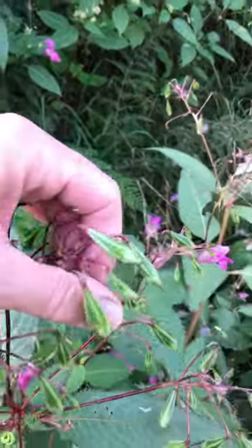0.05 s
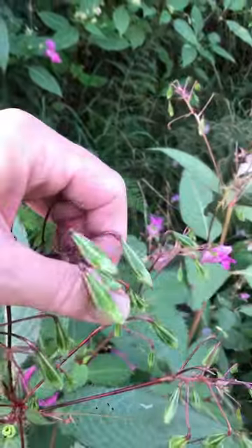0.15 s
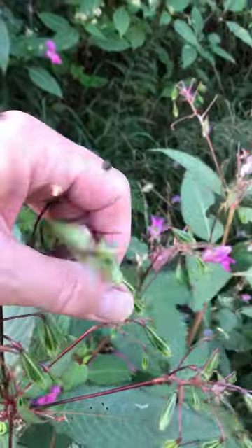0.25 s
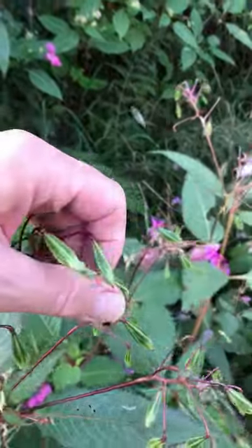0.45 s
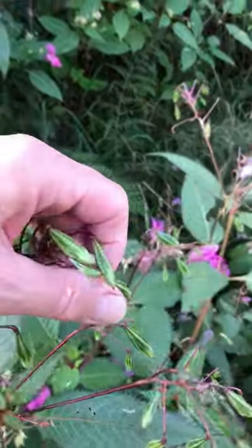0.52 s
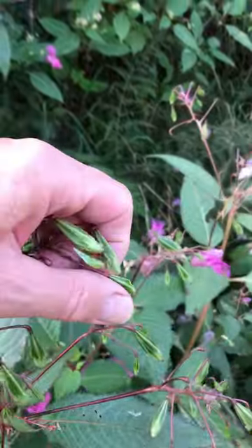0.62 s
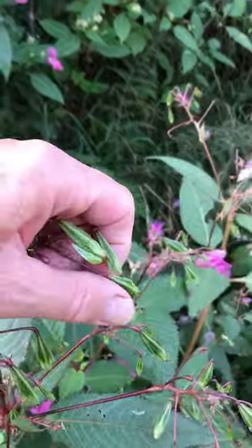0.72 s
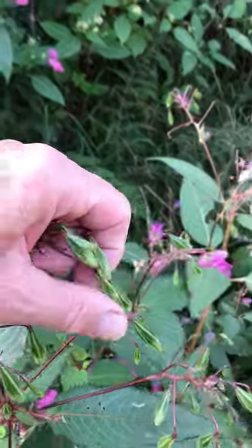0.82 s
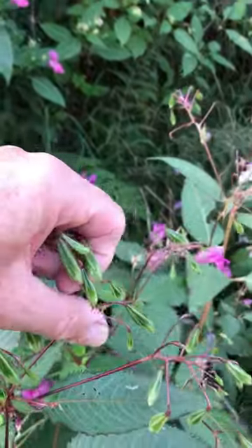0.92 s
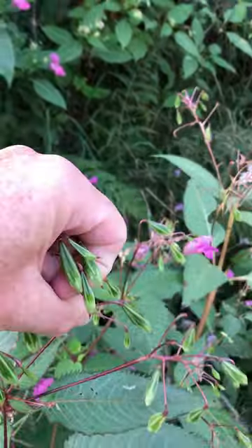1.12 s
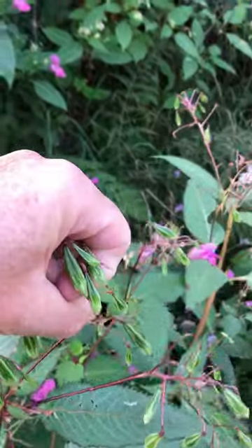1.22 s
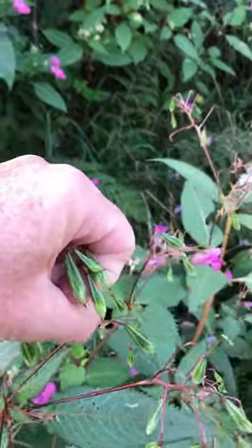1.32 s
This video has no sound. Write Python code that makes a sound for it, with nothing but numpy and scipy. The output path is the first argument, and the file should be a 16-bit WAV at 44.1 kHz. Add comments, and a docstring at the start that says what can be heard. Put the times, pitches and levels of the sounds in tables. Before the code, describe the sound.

Seed pods burst in a hand close by. One splits with a bright, sharp crack at about 0.2 seconds, and a second gives a slightly hollow snap just before 0.3. Husks rub faintly in the fingers. Flung seeds tick irregularly on leaves until about 1.2 seconds, with the clearest tick near 0.8. A faint low outdoor rumble and soft rush of air lie underneath.

```python
"""Ripe seed pods burst in a squeezing hand, close by: one rips along its seam in a bright run of cracks,
then a second snap rings the hollow of the fingers. Husks rub in the fingers and the hand recoils.
Flung seeds and curled husks tick on the leaves around.
Behind it all lie a low outdoor rumble and a faint rush of air."""
import sys
import numpy as np
from scipy import signal
from scipy.fft import rfft, irfft, next_fast_len
from scipy.io import wavfile

SR = 44100
rng = np.random.default_rng(int(sys.argv[2]) if len(sys.argv) > 2 else 0)


def master_out(mix):
    """Clip the mix to full scale and print it as 16-bit PCM to the path in sys.argv[1]."""
    frames = np.transpose(np.atleast_2d(mix))
    ceiling = np.clip(frames, -1, 1)
    pcm = np.round(ceiling * 32767).astype(np.int16)
    wavfile.write(sys.argv[1], SR, pcm)


N = 59535
TIME_S = np.arange(N) / SR
TOP_HZ = 15800


def amp(db):
    return 10 ** (np.asarray(db) / 20)


def unit_rms(x):
    return x / np.sqrt(np.mean(x ** 2) + 1e-20)


def add(out, start_s, x):
    i = round(start_s * SR)
    out[i:i + len(x)] += x[:N - i]


def butterworth(x, cutoff_hz, kind, order):
    return signal.sosfilt(signal.butter(order, cutoff_hz, kind, fs=SR, output="sos"), x)


def noise(spectrum):
    """Unit-rms noise shaped by (freq_hz, gain_db) points on a log axis."""
    freq_hz, gain_db = np.transpose(spectrum)
    size = next_fast_len(N + 8192)
    f = np.fft.rfftfreq(size, 1 / SR)
    gain = amp(np.interp(np.log(f + 1), np.log(freq_hz), gain_db))
    return unit_rms(irfft(rfft(rng.standard_normal(N), size) * gain, size)[:N])


def ring(modes, soft_hz=None, size=4096):
    """One blow into damped modes (pitch_hz, width_hz, level_db); a soft contact cuts above soft_hz."""
    f = np.fft.rfftfreq(size, 1 / SR)
    body = sum(amp(db) * 1j * f * width / (hz * hz - f * f + 1j * f * width) for hz, width, db in modes)
    if soft_hz:
        body = body / (1 + 1j * f / soft_hz - (f / soft_hz) ** 2)
    return irfft(body)[:size // 2]


def scatter(x, near_db, far_db, near_t60_s=0.015, far_t60_s=0.11, top_hz=9000):
    """Direct sound plus dulled reflections: near off leaves and fingers, far off the undergrowth."""
    t = np.arange(SR // 4) / SR
    path = (t == 0) * 1.0
    lowpass = signal.butter(1, top_hz, fs=SR)
    onset = 1 - np.exp(-t / 0.00017)
    for db, t60_s in ((near_db, near_t60_s), (far_db, far_t60_s)):
        tail = signal.lfilter(*lowpass, rng.standard_normal(len(t))) * amp(-60 * t / t60_s) * onset
        path = path + amp(db) * tail / np.linalg.norm(tail)
    return signal.fftconvolve(x, path)


# air rush: freq_hz, gain_db
AIR_SPECTRUM = [(76, -30), (130, -4), (410, -11.5), (472, -17), (863, -10), (1610, -20), (2410, -25),
                (2670, -26.5), (3130, -24.5), (10300, -33.5), (12800, -32), (16000, -34.5)]
# rumble: freq_hz, gain_db
RUMBLE_SPECTRUM = [(20, -36), (32, -17.5), (45, -6), (55, 3), (70, -8), (100, -11.5), (135, -17),
                   (200, -31), (500, -71)]
# rumble envelope: time_s, level_db
RUMBLE_LEVELS = [(0.0, -60.5), (0.048, -59.5), (0.326, -68), (0.394, -56.5), (0.56, -77.5), (0.612, -62.5),
                 (0.868, -61.5), (0.894, -64.5), (0.988, -58), (1.014, -70.5), (1.044, -57), (1.138, -70),
                 (1.164, -61), (1.35, -65.5)]


def outdoors(air_db=-67, air_rise_db_per_s=1):
    """A distant, wavering rumble under a faint, slowly rising rush of air."""
    air = amp(air_db + air_rise_db_per_s * (TIME_S - TIME_S.mean())) * noise(AIR_SPECTRUM)
    rumble_db = np.interp(TIME_S, *np.transpose(RUMBLE_LEVELS))
    return air + amp(rumble_db) * noise(RUMBLE_SPECTRUM)


# rub strokes: start_s, length_s, level_db
RUB_STROKES = [(0.206, 0.065, -58.5), (0.269, 0.053, -57), (0.407, 0.0092, -60), (0.478, .012, -65),
               (0.533, 0.01, -60.5), (.626, 0.041, -62), (0.701, 0.01, -61), (0.751, 0.015, -69.5),
               (0.876, 0.024, -66), (0.931, 0.04, -67), (1.220, 0.0085, -62)]
# rub hiss: freq_hz, gain_db
RUB_SPECTRUM = [(200, 13), (900, 5), (2000, 2), (4500, -0.5), (8000, -5), (12000, -6), (16000, -10.5)]
# kinds of sticking grain: pitch_hz, width_hz, gain_db
GRAIN_MODES = [(1700, 540, -0.5), (3200, 1000, 2), (5500, 1760, 0.5), (8500, 790, -1.5), (12500, 2500, -2)]


def husk_rubs(attack_s=0.0024, release_s=0.005, sag_db=4, slips_per_s=300, grain_db=0.5):
    """Husks and stems rub in the fingers: hiss with tiny sticking grains, sagging through each stroke."""
    grains = np.zeros(N)
    for mode in GRAIN_MODES:
        slips = (rng.random(N) < slips_per_s / SR) * rng.standard_normal(N)
        grains += signal.fftconvolve(slips, ring([mode]))[:N]
    rustle = unit_rms(noise(RUB_SPECTRUM) + amp(grain_db) * unit_rms(grains))
    envelope = np.zeros(N)
    for start_s, length_s, level_db in RUB_STROKES:
        t = TIME_S - start_s
        attack = np.clip(t / attack_s, 0, 1)
        release = np.exp(-np.maximum(t - length_s, 0) / release_s)
        envelope += amp(level_db - sag_db * np.clip(t / length_s, 0, 1)) * attack * release
    return envelope * rustle


# seam cracks: start_s, level_db, pitch_hz, width_hz
SEAM_CRACKS = [(.2122, -14.5, 9000, 2515), (0.2122, -11, 11800, 3000), (0.2138, -2, 12500, 3000),
               (0.2171, -12.5, 14500, 3500), (0.2146, -5, 8500, 1410), (0.2156, -15, 6200, 2000)]
# pod body: pitch_hz, width_hz, level_db
POD_MODES = [(2700, 480, 0), (3900, 1130, 0), (4950, 960, -5.5), (6160, 400, -9.5), (8400, 180, 3)]
# kicked fingers: pitch_hz, width_hz, level_db
FINGER_MODES = [(484, 440, -13.5), (1000, 620, -10.5)]
RIP_START_S = SEAM_CRACKS[0][0]


def pod_rip(near_db=-4.5, far_db=-31):
    """A seam rips in quick cracks; the pod gives way and kicks the fingers."""
    out = np.zeros(N)
    for start_s, level_db, pitch_hz, width_hz in SEAM_CRACKS:
        crack = ring([(pitch_hz, width_hz, level_db)])
        add(out, start_s, scatter(crack, near_db, far_db))
    body = butterworth(ring(POD_MODES), 2300, "high", order=4)  # a small pod radiates little bass
    add(out, RIP_START_S, scatter(body + ring(FINGER_MODES), near_db, far_db))
    return out


# recoil flutter: freq_hz, gain_db
RECOIL_SPECTRUM = [(40, -20.5), (110, 5), (200, -3.5), (350, -2), (600, -30), (1500, -36.5), (5000, -62.5)]


def hand_recoil(gain_db=-49.5, rise_s=0.029, t60_s=0.34):
    """A soft low flutter as hand and stems recoil from the rip."""
    t = np.maximum(TIME_S - RIP_START_S, 0)
    envelope = amp(gain_db - 60 * t / t60_s) * (1 - np.exp(-t / rise_s))
    return envelope * noise(RECOIL_SPECTRUM)


# hits on leaves: start_s, level_db, pitch_hz, knock_rel_db, click_rel_db
LEAF_HITS = [(0.2227, -19, 7460, -6, -6), (0.2325, -14.5, 6100, -37, -4.5), (0.2437, -28, 8350, -19, -18),
             (.2957, -36, 7000, 6.5, 4), (0.4078, -36, 8700, -5, -8), (0.412, -43.5, 1720, -6, 5),
             (0.4808, -32.5, 6670, -10, -15), (.4848, -22, 1390, -31, -21), (0.5263, -26, 4950, -1.5, -9),
             (0.533, -37, 6330, -13, -14), (.5380, -35, 5500, -17, -24), (0.5442, -41, 4400, 3, -22),
             (0.5558, -22, 2900, 5.5, -35), (.5725, -35, 2900, -2, -14), (0.5862, -25.5, 2900, -2.5, -13),
             (0.6228, -20.5, 6400, 0, -12), (0.6253, -21.5, 1640, 0.5, -17), (.6455, -34.5, 3300, 11, -21),
             (0.6534, -34.5, 3600, 4, 10), (0.6827, -31, 5600, -11, -22), (0.6987, -24.5, 2600, -4, -12.5),
             (0.7401, -23, 6500, -0.5, -20), (0.7586, -42.5, 5050, 10, -3), (0.8114, -12, 4700, -3, -14),
             (.8173, -21, 2530, -6, -28), (0.8397, -39, 5500, 4, 9), (0.8809, -27, 1570, -9, -21),
             (0.9176, -28.5, 1880, -15, -27), (.9344, -27, 3790, -3, -10.5), (0.9374, -26.5, 4850, 5, -31),
             (.9493, -39.5, 4300, 12.5, -32), (.9950, -44.5, 3420, 8, -10), (1.0787, -16, 3330, -14, -27.5),
             (1.1586, -41, 7500, -3, -2), (1.193, -27, 2300, -6, -31), (1.2224, -29.5, 5080, -20, -1.5)]


def seed_ticks(leaf_q=5.5, side_q=10, side_rel_db=-8, spread_octaves=0.6):
    """Seeds and husks strike leaves: brief leaf modes, a dull knock, a stem's thud and a bright click."""
    out = np.zeros(N)
    for start_s, level_db, pitch_hz, knock_rel_db, click_rel_db in LEAF_HITS:
        side_hz = np.minimum(pitch_hz * 2 ** (spread_octaves * rng.standard_normal(4)), TOP_HZ)
        leaf = [(pitch_hz, pitch_hz / leaf_q, level_db)]
        leaf += [(hz, hz / side_q, level_db + side_rel_db) for hz in side_hz]
        knock = (1210, 970, level_db + knock_rel_db)
        thud = (420, 380, level_db + knock_rel_db - 2.5)
        click = (10600, 2400, level_db + click_rel_db)
        blow = ring(leaf + [knock, thud], soft_hz=6500)  # cushioned by the moist leaf
        add(out, start_s, scatter(blow - ring([click]), near_db=-9, far_db=-17.5))
    return out


# snap crack: pitch_hz, width_hz, level_db
SNAP_MODES = [(7280, 160, -9), (9380, 2350, -1.5), (14400, 2500, -6)]
# hollow of the hand: pitch_hz, width_hz, level_db
HOLLOW_MODES = [(195, 197, -1.5), (824, 91, 4.5), (1280, 147, -4), (1666, 340, 6.5), (2680, 590, 7),
                (3680, 350, 9.5), (4070, 170, 5.5)]


def pod_snap(start_s=0.274, hollow_lag_s=0.00005, hollow_top_hz=4700, near_db=-23.5, far_db=-31):
    """One clean snap rings the hollow of the hand around the pod."""
    out = np.zeros(N)
    add(out, start_s, scatter(ring(SNAP_MODES), near_db, far_db))
    hollow = butterworth(ring(HOLLOW_MODES), hollow_top_hz, "low", order=10)
    add(out, start_s + hollow_lag_s, scatter(hollow, near_db, far_db))
    return out


def scene():
    return (outdoors() + husk_rubs() + pod_rip() + hand_recoil() + seed_ticks() + pod_snap())[None]


def record(dry):
    """Steep low-pass at TOP_HZ."""
    return signal.sosfilt(signal.ellip(10, 0.1, 80, TOP_HZ, fs=SR, output="sos"), dry)


dry = scene()
out = record(dry)
master_out(out)
```